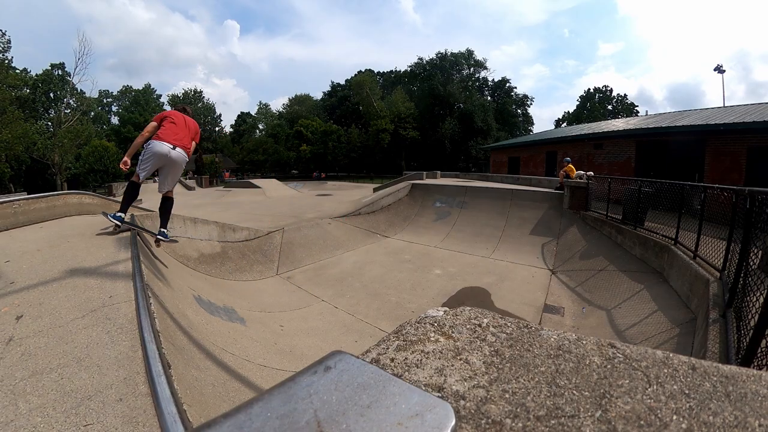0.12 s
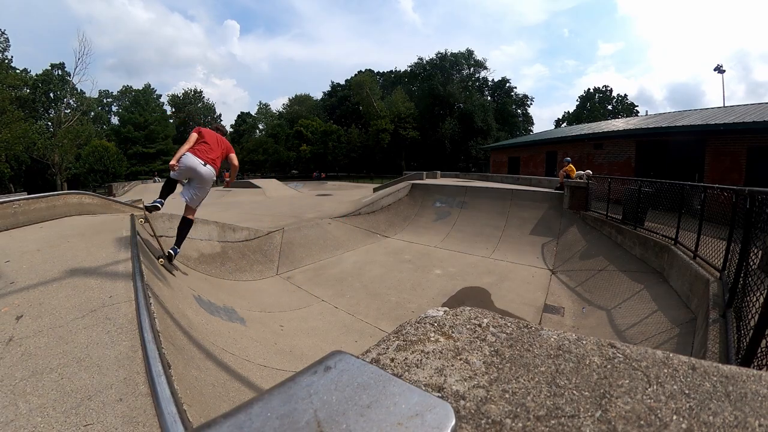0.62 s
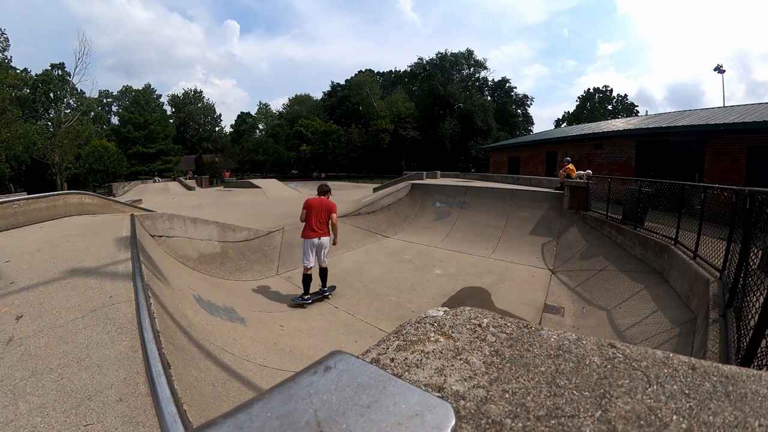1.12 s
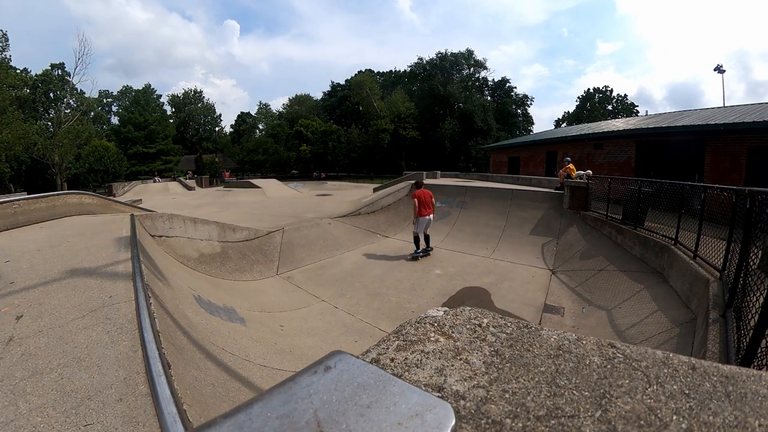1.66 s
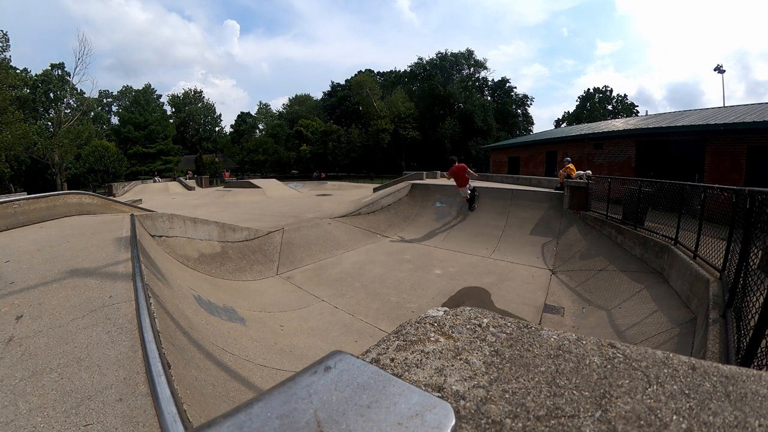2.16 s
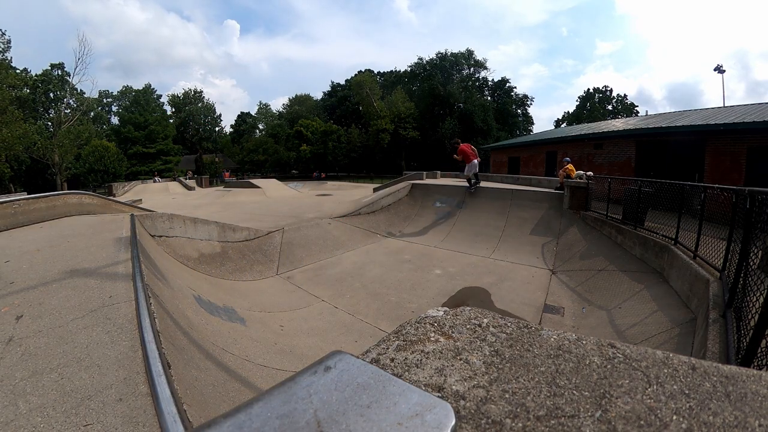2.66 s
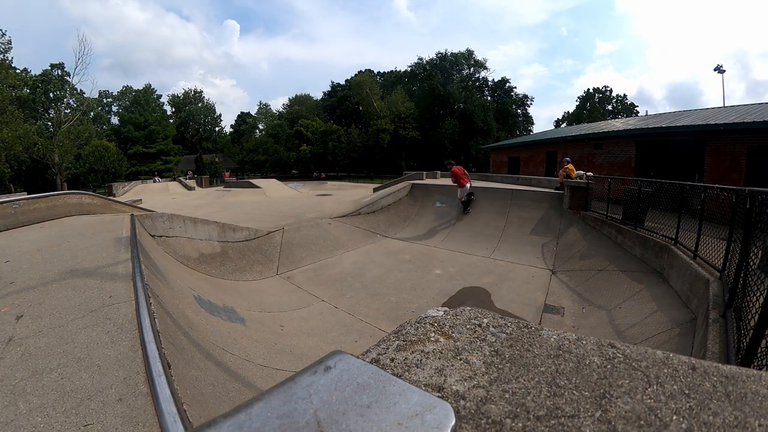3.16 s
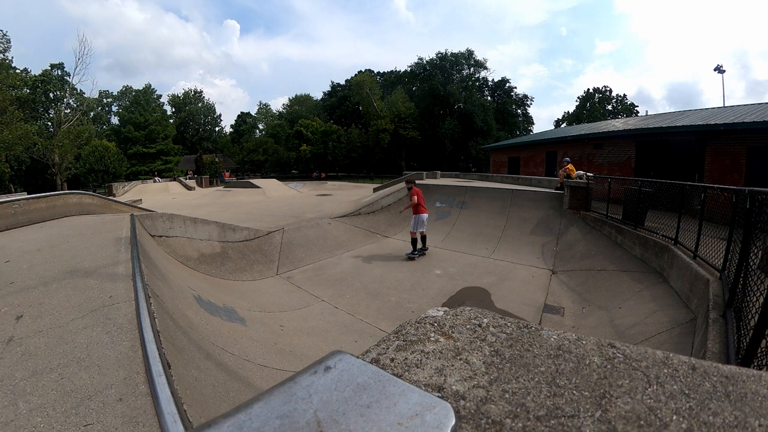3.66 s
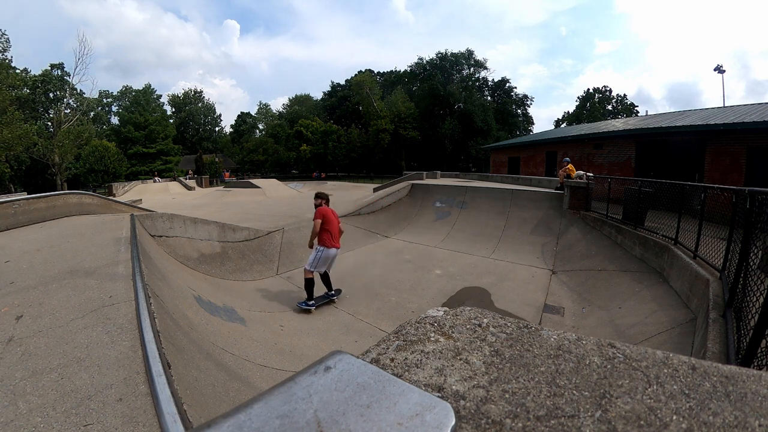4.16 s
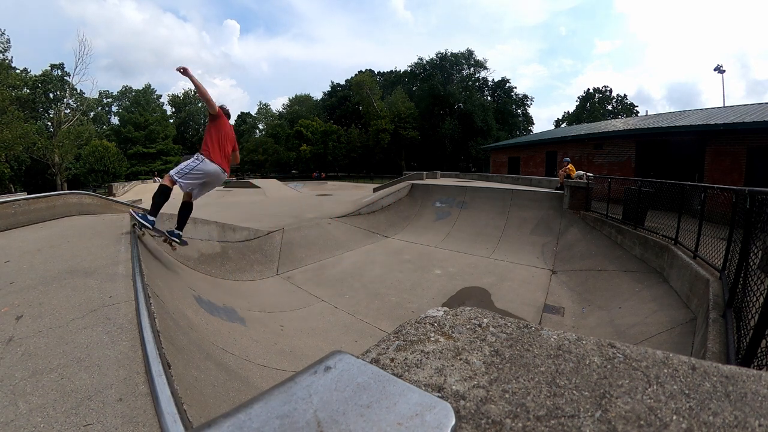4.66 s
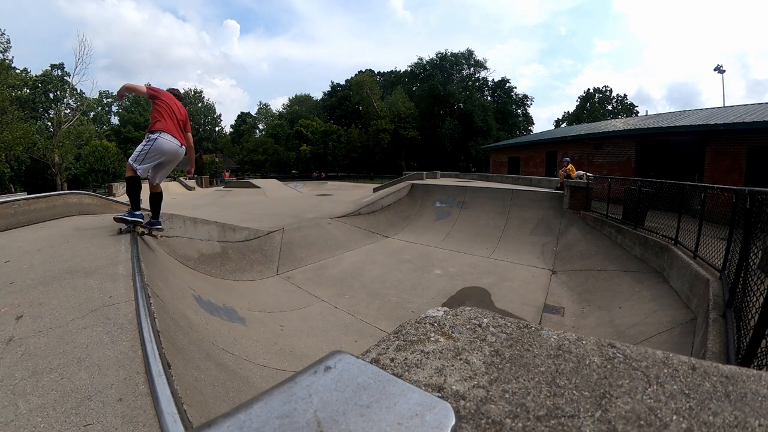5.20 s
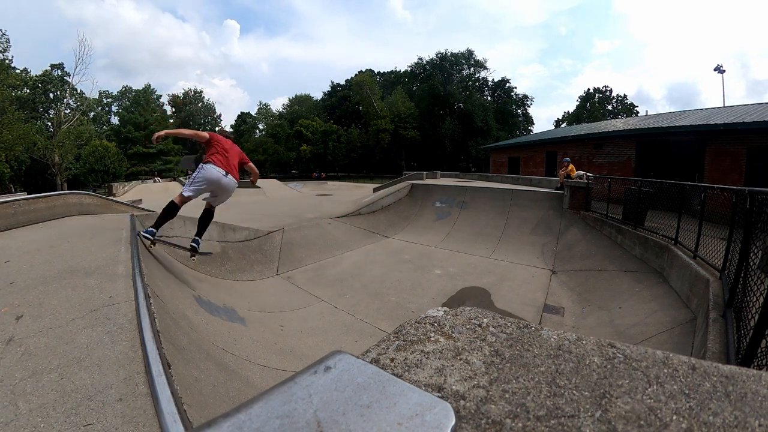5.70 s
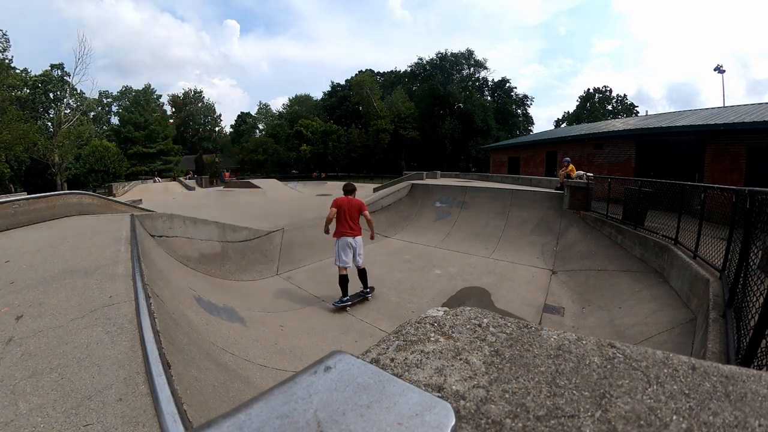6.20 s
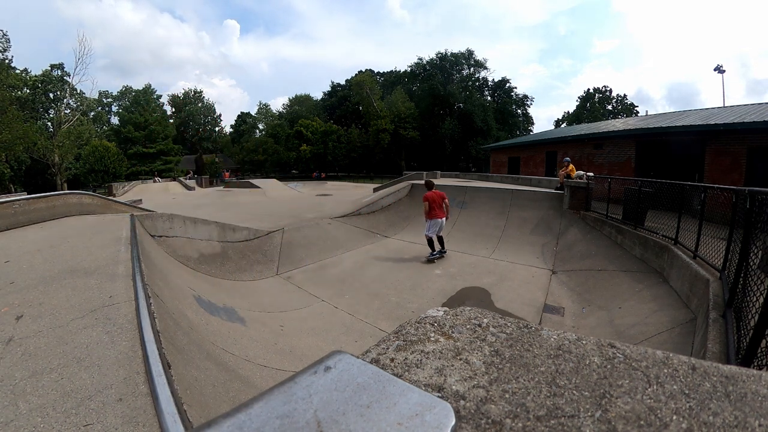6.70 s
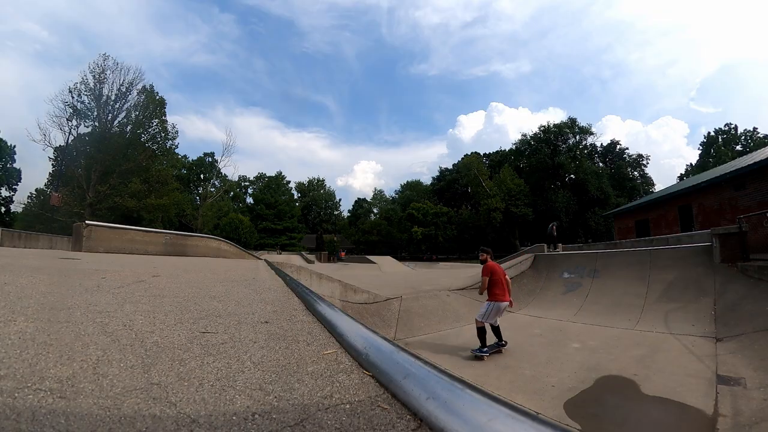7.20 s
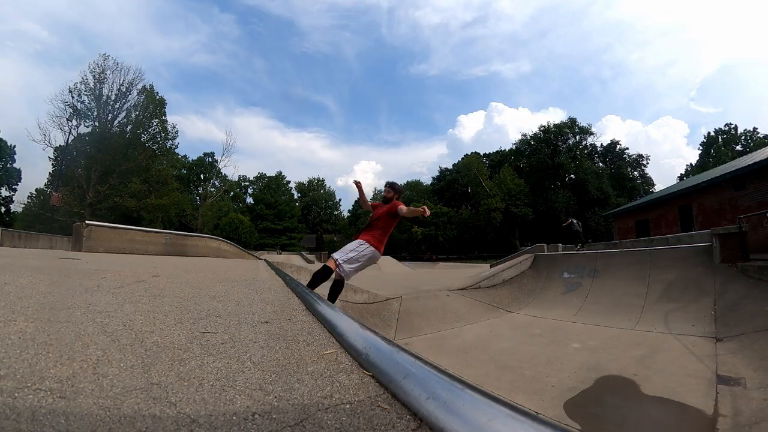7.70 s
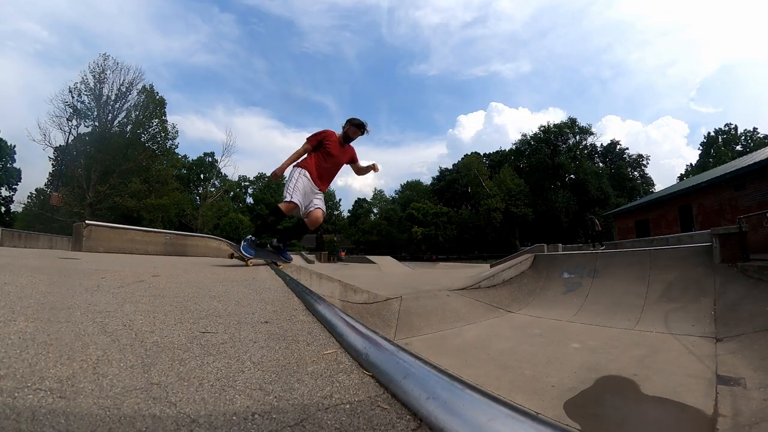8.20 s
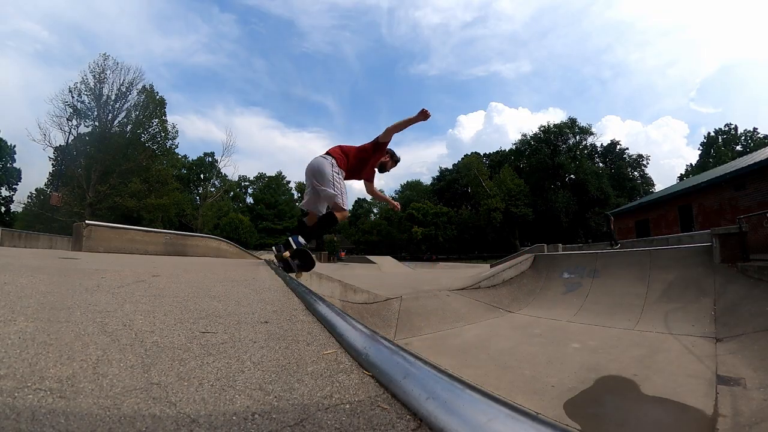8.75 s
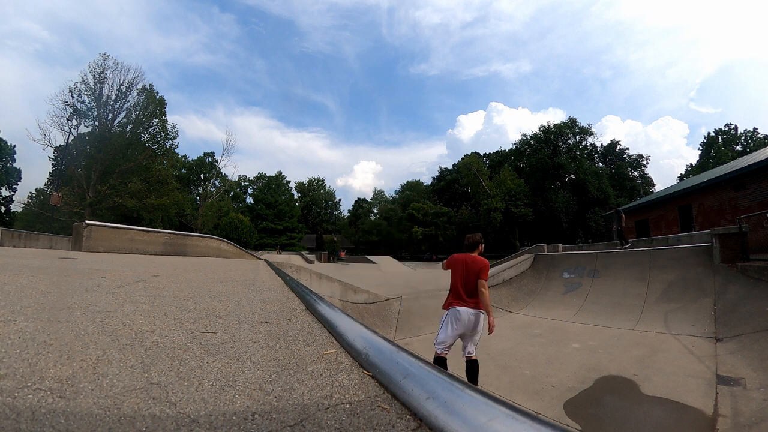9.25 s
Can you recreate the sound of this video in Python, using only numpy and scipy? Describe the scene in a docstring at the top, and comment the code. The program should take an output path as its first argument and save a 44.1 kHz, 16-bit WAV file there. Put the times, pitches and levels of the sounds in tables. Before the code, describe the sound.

Close hollow skateboard rolling swells and fades across a concrete bowl, broken by hard board knocks, paired joint clicks, gritty scuffs and low wind thumps.

```python
"""Skateboard in a concrete bowl

Heard close by, at the two microphone ports of a small camera: a board rolls in short runs.
Shaped noise makes the wheels drone through the deck; short rattles of force ring the deck's modes as the
board knocks and clacks on edges, joints and ground, and gliding rough tones grind along the steel edge.
The far wall answers with a slap and a diffuse tail. Lumpy deep noise swells at the ports, as wind and as low
thumps under some knocks; steadier coloured noise is the hiss of trees, traffic and insects far off."""
import sys
import numpy as np
from scipy import signal
from scipy.fft import rfft, irfft, next_fast_len
from scipy.io import wavfile
from scipy.ndimage import uniform_filter1d, map_coordinates

SR = 44100
rng = np.random.default_rng(int(sys.argv[2]) if len(sys.argv) > 2 else 0)


def invert_db(level):
    """Linear amplitude ratio for a level in decibels (20 dB per decade), elementwise."""
    return 10 ** (np.asarray(level, dtype=float) / 20)


def master_out(mix):
    """Clip the mix to full scale and print it as 16-bit PCM to the path in sys.argv[1]."""
    frames = np.transpose(np.atleast_2d(mix))
    ceiling = np.clip(frames, -1, 1)
    pcm = np.round(ceiling * 32767).astype(np.int16)
    wavfile.write(sys.argv[1], SR, pcm)


N = 412776  # length [samples]


def unit(x):
    """Scaled to rms 1."""
    return x / np.sqrt(np.mean(x ** 2) + 1e-20)


def along(points, hz):
    """(frequency, value) points read on a log frequency axis."""
    f, v = np.transpose(points)
    return np.interp(np.log(hz + 1), np.log(f + 1), v)


def curves(rows, t):
    """Each column after the time, read at times t."""
    s, *cols = np.transpose(rows)
    return [np.interp(t, s, col) for col in cols]


def wobble(rate):
    """A smooth random curve, rate knots a second."""
    knots = rng.standard_normal(int(N * rate / SR) + 4)
    return map_coordinates(knots, [np.arange(N) * rate / SR])


def filtered(x, response):
    """x times a complex response of frequency."""
    size = next_fast_len(x.shape[-1] + 8192)
    spectrum = rfft(x, size) * response(np.fft.rfftfreq(size, 1 / SR))
    return irfft(spectrum, size)[..., :x.shape[-1]]


def noise(spectrum):
    """Coloured noise of rms 1."""
    return unit(filtered(rng.standard_normal(N), lambda hz: invert_db(along(spectrum, hz))))


def above(hz, edge_hz, order=4):
    """A smooth weight from 0 below the edge to 1 above it."""
    return hz ** order / (hz ** order + edge_hz ** order)


def answer(x, decay, lag_s, rise_s):
    """A diffuse echo, a little different at each port, each frequency dying at its own speed."""
    hz, t, z = signal.stft(rng.standard_normal((2, SR // 2)), SR, nperseg=256)
    shape = invert_db(-60 * t / along(decay, hz)[:, None]) * (1 - np.exp(-t / rise_s))
    mid, side = signal.istft(z * shape, SR, nperseg=256)[1]
    tail = np.array([mid + 0.022 * side, mid - 0.022 * side]) / np.linalg.norm(mid)
    late = np.pad(x, (round(lag_s * SR), 0))
    return signal.fftconvolve(late[None], tail, axes=1)[:, :N]


# how far the left port leads the right: (frequency [Hz], phase [radians])
PORT_LEAD = [(100, 0), (950, 0), (1550, 0.67), (2330, 0.66), (7840, 0), (9130, 0.67)]
# the part of the sound that differs between the ports: (frequency [Hz], level re the sound [dB])
PORT_UNLIKE = [(130, -90), (300, -95), (650, -87), (1300, -28.5), (3000, -15), (6500, -3), (14000, -8)]


def ports(x):
    """Two close ports: the same sound, part of the upper range unlike, left a little ahead."""
    part = filtered(x, lambda hz: invert_db(along(PORT_UNLIKE, hz)))
    z = signal.stft(part, nperseg=256)[2]
    scrambled = z * np.exp(2j * np.pi * rng.random(z.shape))
    other = unit(signal.istft(scrambled, nperseg=256)[1][:N]) * np.std(part)
    sign = np.array([[1], [-1]])  # left, right
    return filtered(x, lambda hz: np.exp(.5j * sign * along(PORT_LEAD, hz))) + sign * other


# colour of the far hiss: (frequency [Hz], relative level [dB])
PARK_COLOUR = [(88, 16), (150, 14), (237, 6), (402, 0.5), (460, -1), (725, 4.5), (844, -1), (1160, 3),
               (1360, 2), (2690, -7), (3440, -9), (6940, -13.5), (7900, -33), (8700, -26), (14000, -71)]
# strength of the insects before their quick flutter: (time [s], level [dB])
INSECT_LEVEL = [(0, -83), (4.8, -53), (5.1, -61.5), (5.6, -53), (6.7, -94), (6.8, -54), (8.5, -54),
                (9.36, -65)]


def park():
    """Far hiss of trees and traffic as swaying coloured noise, and a thin fluttering band of insects."""
    insects_db, = curves(INSECT_LEVEL, np.arange(N) / SR)
    # (frequency [Hz], relative level [dB])
    band = [(5500, 3.5), (6600, 11), (7150, 5), (7500, 9), (7850, 5), (8300, -28)]
    sway_db, flutter_db = .6 * wobble(2.3), 0.88 * wobble(29)
    hiss = invert_db(-44 + sway_db) * noise(PARK_COLOUR)
    return hiss + invert_db(insects_db + flutter_db) * noise(band)


# colour of the deep swells: (frequency [Hz], relative level [dB])
SWELL_COLOUR = [(12, -43), (20, -1.5), (59, -7), (258, -29.5), (282, -47), (400, -60), (520, -38),
                (880, -120)]
# deep swells at the ports: wind gusts and low thumps under some of the board's blows,
# before the gain of each port; rise and fall are the times for 20 dB:
# (peak time [s], peak level [dB], rise [s], fall [s])
DEEP_SWELLS = [(.07, -37, 0.087, 0.18), (.8, -15, 0.21, 0.24), (1.04, -19.5, .09, 0.24),
               (1.41, -23.5, 0.2, 0.16), (2.47, -17, 0.34, 0.08), (2.8, -46, 0.71, 0.25),
               (3.02, -26, 0.076, 0.025), (4.17, -31, 0.063, 0.22), (4.8, -33.5, 0.3, 0.76),
               (5.42, -28, 0.056, 0.37), (6.13, -39, 1, 0.023), (6.8, -30.5, 0.14, 0.025),
               (8.13, -38, 0.3, 0.32), (8.78, -29.5, 0.25, 0.046)]


def swells():
    """Wind and low thumps at the ports: lumpy deep noise that swells and sinks, mostly unlike at the two."""
    t = np.arange(N) / SR
    span_db, calm_db = 20, -62
    swells_db = [db - span_db * np.maximum((s - t) / rise, (t - s) / fall)
                 for s, db, rise, fall in DEEP_SWELLS]
    level_db = np.maximum(np.max(swells_db, axis=0), calm_db)
    shared = noise(SWELL_COLOUR)
    lumps = [unit(invert_db(2.2 * wobble(14)) * (noise(SWELL_COLOUR) + .45 * shared)) for _ in range(2)]
    return invert_db(level_db + [[1.5], [2.2]]) * np.array(lumps)  # left and right port gain [dB]


# the far wall's answer fades while the board is up on that wall: (time [s], relative level [dB])
WALL_LEVEL = [(0, 2), (2, -3), (3, -21.5), (4, 1), (9.36, -5)]
# how the wall's diffuse answer dies: (frequency [Hz], t60 [s])
WALL_DECAY = [(150, 0.15), (800, 0.11), (3000, 0.21), (9000, 0.22)]


def wall_tail(hits):
    """Diffuse answer of the far wall: rough concrete returns little treble."""
    echo_db, = curves(WALL_LEVEL, np.arange(N) / SR)
    far = filtered(hits, lambda hz: 1 - above(hz, 1200, order=2))
    return answer(invert_db(echo_db) * far, WALL_DECAY, lag_s=0.028, rise_s=0.19)


def wall_slap(hits):
    """First return from the far wall, spread in time by its curve."""
    echo_db, = curves(WALL_LEVEL, np.arange(N) / SR)
    lag_s, smear_s = 0.040, 0.003
    dull = filtered(hits, lambda hz: 1 - above(hz, 6800, order=2))
    slap = invert_db(echo_db - 13) * np.pad(dull, (round(lag_s * SR), 0))[:N]
    t = np.arange(SR // 20) / SR
    spread = rng.standard_normal(len(t)) * np.exp(-t / smear_s)
    return signal.fftconvolve(slap * invert_db(3.9 * wobble(300)), spread / np.linalg.norm(spread))[:N]


# how the scatter from ramps and sheds dies: (frequency [Hz], t60 [s])
SCATTER_DECAY = [(150, 0.74), (1000, 0.16), (8000, 0.15)]


def scatter(hits):
    """Ramps and sheds throw the blows back as a ragged, quick diffuse tail."""
    return invert_db(-14.5) * answer(hits * unit(wobble(1300)), SCATTER_DECAY, lag_s=0.0074, rise_s=0.00081)


# second path off the concrete: (time [s], lag [ms], share of the direct sound [0-1])
GROUND_BOUNCE = [(0, 0.58, 0), (1, 0.26, 0.09), (2.3, 0.26, 0.45), (3.3, 0.24, 0.25), (4.2, 0.24, 0.13),
                 (4.6, 0.54, 0), (6, 0.37, 0.12), (6.7, 0.3, 0.41), (6.85, 0.39, 0.34), (7.25, 0.42, 0.43),
                 (7.5, 0.62, 0.72), (7.8, 0.74, 0.15), (8.9, 0.86, 0.25), (9.15, 0.63, 0.67),
                 (9.36, 0.52, 0.68)]


def off_the_ground(x):
    """A second, duller arrival a fraction of a millisecond late combs the spectrum."""
    lag_ms, share = curves(GROUND_BOUNCE, np.arange(N) / SR)
    dull = filtered(x, lambda hz: 1 - above(hz, 6000, order=2))
    return x + share * map_coordinates(dull, [np.arange(N) - lag_ms * SR / 1000])


# steel grinding on the edge:
# (start [s], end [s], level [dB], start pitch [Hz], end pitch [Hz])
EDGE_SCRAPES = [(4.794, 4.833, -37, 1500, 1580), (4.842, 4.921, -37, 1560, 1077),
                (5.748, 5.82, -39, 3870, 1700), (5.826, 5.843, -40, 2930, 1830),
                (6.83, 6.86, -26, 1900, 1576), (8.013, 8.147, -41, 2080, 1896),
                (8.21, 8.398, -41, 1955, 1900), (8.815, 8.835, -31, 1466, 1480)]


def scrapes():
    """Gritty stick and slip: a smeared pitch with its overtone, gliding as the axle slides."""
    out, t = np.zeros(N), np.arange(N) / SR
    grit = invert_db(2.9 * wobble(330))
    smear = 0.146 * wobble(990)
    for start, end, db, start_hz, end_hz in EDGE_SCRAPES:
        on = (t >= start) & (t < end)
        u = (t[on] - start) / (end - start)
        pitch_hz = (start_hz + (end_hz - start_hz) * u) * (1 + smear[on])
        phase = 2 * np.pi * np.cumsum(pitch_hz) / SR
        stroke = np.minimum(1, 8 * np.minimum(u, 1 - u))
        tone = np.sin(phase) + 0.54 * np.sin(2 * phase)
        out[on] += invert_db(db) * stroke * unit(grit[on] * tone)
    return out


# one list for each run across the bowl:
# (time [s], relative rolling strength [dB], drone centre [Hz], relative wheel bite [dB])
BOWL_RUNS = [
    [(0.56, -45, 510, -2), (0.924, -15.5, 500, -6), (0.978, -20.5, 390, 1), (1.172, -25, 437, -2),
     (1.22, -27.5, 384, -7), (1.442, -28.5, 430, -1.5), (1.866, -25.5, 390, -5), (1.956, -21.5, 507, 0),
     (2.062, -20.5, 482, 3), (2.204, -25, 422, 2), (2.29, -34, 460, 9), (2.46, -54, 300, 6)],
    [(3.07, -54, 466, 5), (3.14, -30.5, 596, -4), (3.175, -24.5, 596, -17), (3.242, -26, 475, -5.5),
     (3.404, -21.5, 450, 0), (3.624, -32, 340, 0), (3.89, -28.5, 312, -1), (3.912, -26, 390, -5),
     (4.242, -21, 363, -1.5), (4.388, -19.5, 400, 2), (4.43, -20.5, 493, -3.5), (4.76, -27.5, 340, -22.5),
     (4.96, -47, 340, 2)],
    [(5.76, -46, 424, 15), (5.89, -42, 550, 9), (5.942, -24, 446, 1), (5.998, -14.5, 426, -8),
     (6.034, -22.5, 503, 2.5), (6.148, -19, 425, 3.5), (6.214, -16.5, 480, -4), (6.236, -26.5, 413, -2.5),
     (6.428, -32.5, 357, 7.5), (6.544, -34, 490, 7), (6.732, -35.5, 430, 8), (6.76, -32.5, 476, 9)],
    [(6.78, -28.5, 342, -6), (6.83, -28, 557, 7), (7.004, -22, 366, -10), (7.072, -25.5, 430, -3.5),
     (7.156, -21, 350, -6), (7.272, -19, 410, -5), (7.464, -16.5, 338, 0), (7.792, -23, 407, -5),
     (7.818, -24.5, 500, -9.5), (7.948, -38.5, 334, 1.5), (8.014, -32.5, 450, -3), (8.08, -65, 415, 12)],
    [(8.8, -33, 310, 6), (8.856, -35.5, 290, -1), (9.02, -23.5, 400, -24), (9.068, -13.5, 465, -28),
     (9.144, -13.5, 510, -16), (9.232, -15.5, 478, -3), (9.316, -17.5, 354, -2), (9.36, -14, 353, -4)],
]
# shoes, tail or wheels scuff sideways:
# (centre [s], half length [s], relative grit level [dB], body re grit [dB])
SIDE_SCUFFS = [(0.104, 0.1, -43.5, 5.5), (0.256, 0.088, -44.5, -18), (2.62, 0.063, -47, 1),
               (4.6, 0.062, -34.5, -36), (5.338, 0.067, -45, -31), (5.597, 0.079, -52, 9.5),
               (5.846, 0.04, -43, 20), (6.863, 0.0062, -52, 15), (8.177, 0.11, -37.5, 1),
               (8.377, 0.055, -40.5, -4), (8.68, 0.19, -43, 1.5)]


def controls(t):
    """Relative levels of thrum, drone, rasp and grit, and the drone centre: strength and bite drive them."""
    strength_db, centre_hz, bite_db = curves(np.vstack(BOWL_RUNS), t)
    rolling = sum((t >= run[0][0]) & (t <= run[-1][0] + .03) for run in BOWL_RUNS) > 0
    over_db = strength_db + 27  # over the usual strength
    # slopes are dB per dB; the drone follows the strength one to one
    thrum_db = -35.5 + 0.23 * over_db
    drone_db = strength_db - 0.5
    rasp_db = -32 + 0.69 * over_db + bite_db
    grit_db = -39 + 0.68 * over_db + 0.37 * bite_db
    levels = rolling * invert_db([thrum_db, drone_db, rasp_db, grit_db])
    for s, half_s, db, body_db in SIDE_SCUFFS:
        layers_db = db + np.array([[body_db + 2.5], [body_db], [body_db / 2 - 0.5], [0]])
        levels = np.hypot(levels, np.exp(-((t - s) / half_s) ** 2) * invert_db(layers_db))
    return levels, centre_hz


# colour of wheels on concrete: (frequency [Hz], relative level [dB])
WHEEL_COLOUR = [(53, 25), (90, -1.5), (138, 2.5), (182, 0), (241, 2), (354, -5.5), (402, -9.5), (458, -9),
                (815, -6.5), (1120, -6), (1280, -9), (2140, -23.5), (7880, -31.5), (11600, -38.5),
                (15000, -47)]
# what the board rings with, damped by the rider's feet; blows() plays it too:
# (frequency [Hz], relative level [dB], t60 before the extra damping of a blow [s])
BOARD_MODES = [(155, -1, .05), (237, -4, .035), (350, 0, .035), (440, -1, .03), (530, 0, .035),
               (690, -2, .025), (850, -3, .022), (1104, -2, .022), (1300, -4, .018), (1550, -3, .018),
               (1800, -5, .016), (2120, -4, .016), (2450, -5, .014), (3100, -6, .012), (3550, -6, .012)]


def roll():
    """The grain of the concrete shakes the wheels; the deck drones at a pitch that moves with load and angle."""
    grain = rng.standard_normal(N) * invert_db(1.37 * wobble(150) + 1.3 * wobble(30))  # uneven surface
    grain = grain + 5 * rng.standard_normal(N) * (rng.random(N) < 300 / SR)  # loose specks of grit
    grain = grain + 8 * rng.standard_normal(N) * (rng.random(N) < 35 / SR)  # pits and pebbles
    hz, t, z = signal.stft(grain, SR, nperseg=1024, noverlap=768)
    hz = hz[:, None]
    levels, centre_hz = controls(t)

    from_centre = np.log((hz + 1) / centre_hz)
    hump = 1 + 1.7 * np.exp(-(from_centre / 0.5) ** 2)
    hump = hump + 2.6 * np.exp(-(from_centre / 0.08) ** 2)  # the sharp core of the drone
    hump = hump * (0.27 + 0.82 * above(hz / centre_hz, 1))  # little sounds far below the drone
    # each mode falls to half its height 2.26 / t60 Hz to either side
    deck = sum(invert_db(db) / (1 + ((hz - mode_hz) * t60 / 2.26) ** 2) for mode_hz, db, t60 in BOARD_MODES)
    colour = invert_db(along(WHEEL_COLOUR, hz)) * (1 + .9 * deck) * np.ones_like(t)

    above_thrum, above_deck, above_rasp = above(hz, 214, order=6), above(hz, 747), above(hz, 1770)
    thrum = colour * (1 - above_thrum) * above(hz, 92)
    drone = colour * hump * above_thrum * (1 - above_deck)
    rasp = colour * above_deck * (1 - above_rasp)
    grit = colour * above_rasp
    gain = sum(level * part / np.sqrt(np.mean(part ** 2, axis=0))
               for part, level in zip((thrum, drone, rasp, grit), levels))
    patches = uniform_filter1d(uniform_filter1d(rng.standard_normal(z.shape), 3, 0), 30, 1)
    patchy_db = (2.2 - .9 * above_rasp) * unit(patches)
    return signal.istft(z * gain * invert_db(patchy_db - 5), SR, nperseg=1024, noverlap=768)[1][:N]


# single knocks and clacks of the board, on edges, joints and ground; the steel gets 2.5 dB on top:
# (time [s], peak of the ring [dB], loudest ring [Hz], steel re ring [dB], contact [ms])
BOARD_KNOCKS = [(.033, -17, 1230, 7, 7.2), (.0385, -3, 2160, -7, 1.6), (.047, -21, 200, -32, 8),
                (.051, -8, 757, -7.5, 1), (.226, -25.5, 740, -13, 6.9), (.246, -26, 816, -2, 4),
                (.259, -26, 900, -10, 5.8), (0.546, -7.5, 640, -19.5, 17.7), (.549, -8, 1230, -2.5, 1.7),
                (.559, -12.5, 600, -31, 1.3), (.739, -4, 1310, -13, 2.4), (.742, -8, 585, -11.5, 6.3),
                (2.504, -5.5, 1580, -13.5, 4.8), (2.507, -11.5, 740, -17, 4.7),
                (2.518, -23.5, 526, -11, 9.7), (3.011, -9.5, 1180, -22, 6.6), (3.0145, -6, 770, -23, 1.7),
                (3.0185, -6, 314, -30, 1.2), (3.024, -11, 560, -24, 5.6), (3.033, -18.5, 776, -27, 4.2),
                (3.172, -9.5, 1100, -17, 7.6), (3.179, -5, 790, -22, 5.8), (3.565, -9.5, 260, -23, 8.1),
                (4.69, -13, 1443, -6.5, 8.6), (4.816, -7, 1310, -11, 2.9), (4.83, -24, 615, 5.5, 1.5),
                (4.845, -13, 374, -10, 6.6), (4.864, -11.5, 342, -13, 3.4), (4.88, -16.5, 1210, -12.5, 4),
                (4.897, -27, 420, 3, 7), (4.919, -49, 440, 0, 5.5), (4.967, -37, 627, 7.5, 0.57),
                (5.569, -23.5, 1138, -4, 9), (5.585, -42, 500, 7, 5.7), (5.7245, -11, 1520, -1.5, 3),
                (5.738, -16, 1710, -3.5, 4.6), (5.766, -28, 2540, 2, 4.5), (5.786, -6, 1380, -11, 5.9),
                (5.827, -12.5, 454, -14, 17), (5.857, -4, 580, -6, 1.7), (6.276, -7, 790, -16, 3.6),
                (6.785, -13, 650, -29, 6.5), (6.798, -10, 1150, -38, 1.8), (6.818, -13, 700, -18, 9.2),
                (6.825, -15, 620, -12, 5.4), (6.836, -14.5, 910, -10, 7.4), (6.845, -26, 1930, -5, 4.2),
                (6.861, -15.5, 333, -11, 2.1), (7.394, -3, 352, -33, 1.3), (7.455, -7, 448, -20, 1.1),
                (7.737, -25.5, 1300, -4, 20), (7.936, -17.5, 1220, -9.5, 14), (7.954, -13, 795, -16, 14.7),
                (8.021, -11.5, 1390, -14, 7.1), (8.029, -9, 467, -41, 5.1), (8.039, -6, 884, -25, 2.9),
                (8.079, -39, 1490, -11, 1.2), (8.084, -10.5, 1780, -12.5, 5),
                (8.098, -25.5, 1900, -10, 4.4), (8.1295, -16.5, 1300, -17, 3.3),
                (8.149, -11, 1085, -1.5, 6.1), (8.154, -4.5, 444, -32, 3), (8.158, -12.5, 167, -32, 5.2),
                (8.193, -22, 410, -11, 8.9), (8.391, -23, 1600, 0, 1.5), (8.394, -17.5, 1060, -10, 4.3),
                (8.4525, -18.5, 1520, -10, 0.98), (8.458, -15, 1380, -13, 3.3), (8.835, -7, 1150, -15, 4.7),
                (8.84, -7.5, 252, -24, 4.8), (8.929, -11, 1000, -15, 9), (8.943, -5, 885, -22.5, 3.5),
                (8.9745, -12, 1300, -9, 1.8), (8.976, -4.5, 454, -9, 5.9), (8.985, -9.5, 300, -25, 3.2),
                (8.994, -8, 1130, -16, 2.1), (8.995, -2.5, 223, -28, 3.4)]
# slab joints, crossed by both axles:
# (front time [s], rear time [s], front level [dB], rear level [dB], loudest ring under the front axle [Hz])
SLAB_JOINTS = [(1.1385, 1.2155, -5.5, -7, 760), (1.808, 1.874, -9, -9, 760), (3.556, 3.633, -9, -12, 950),
               (4.1365, 4.2095, -9, -9, 520), (4.188, 4.254, -5.5, -4, 520),
               (6.1945, 6.2695, -5.5, -7, 800)]


def contacts():
    """Single knocks, then joints crossed by both axles, as like rows; the tail rings lower than the nose."""
    steel_db, contact_ms, rear_ring = -22, 3, .65
    crossings = []
    for front, rear, front_db, rear_db, hz in SLAB_JOINTS:
        crossings.append((front, front_db, hz, steel_db, contact_ms))
        crossings.append((rear, rear_db, rear_ring * hz, steel_db, contact_ms))
    return BOARD_KNOCKS + crossings


def blows():
    """Each contact is a short rattle of force: it rings the modes near the struck spot, the steel only cracks."""
    out, t = np.zeros(N + SR), np.arange(SR // 8) / SR
    hz, level, t60 = np.transpose(BOARD_MODES)[:, :, None]
    damping = 1.5  # a blow dies faster than the free ring, wheels and tail pressed down
    below_db, above_db = 11, 3  # loss per octave below and above the loudest ring
    steel = np.vstack([signal.butter(1, [1600, 3800], "bandpass", fs=SR, output="sos"),
                       signal.butter(2, 8000, fs=SR, output="sos")])
    for s, db, ring_hz, steel_db, ms in contacts():
        contact = np.exp(-t * 1000 / ms) * (1 - np.exp(-t * 1000 / (0.19 * ms + 0.39)))
        ragged = invert_db(3.7 * map_coordinates(rng.standard_normal(128), [t * 600]))  # the contact chatters
        force, chatter = rng.standard_normal((2, len(t))) * contact * ragged
        # the first push, half a cycle of the struck ring; long contacts build up instead
        push = np.sin(np.pi * np.minimum(1, 2 * ring_hz * t))
        force = force + 3 * np.exp(-ms / 2.5) * push
        softness = signal.butter(2, 1200 + 0.46 * ring_hz, fs=SR, output="sos")
        force = signal.sosfilt(softness, force)  # soft blows pass no sharp edge

        pitch_hz = hz * rng.normal(1, 0.07, hz.shape)
        octaves = np.log2(hz / ring_hz)
        pitch_hz[np.abs(octaves).argmin()] = ring_hz  # the grip of feet and ground pulls the nearest mode
        nearness_db = 4 * np.exp(-(octaves / 0.25) ** 2) - np.maximum(-below_db * octaves, above_db * octaves)
        scatter_db = rng.normal(0, 2, hz.shape)
        bends = 1 - np.exp(-t * hz / 0.29)  # low modes take a moment to bend
        decay_db = -60 * damping * t / t60
        modes = invert_db(level + nearness_db + scatter_db + decay_db) * bends * np.sin(2 * np.pi * pitch_hz * t)

        ring = signal.fftconvolve(force, modes.sum(axis=0))[:len(t)]
        crack = signal.sosfilt(steel, chatter * contact ** 0.036)
        start = round(s * SR)
        out[start:start + len(t)] += invert_db(db) * ring / np.abs(ring).max()
        out[start:start + len(t)] += invert_db(db + steel_db + 2.5) * crack / np.abs(crack).max()
    return signal.lfilter(*signal.butter(3, 105, "highpass", fs=SR), out[:N])  # small board, no deep bass


def scene():
    """Board and park at the ports, with wall, scatter and deep swells."""
    hits = blows()
    board = off_the_ground(roll() + scrapes() + hits)
    at_ports = ports(board + wall_slap(hits) + park())
    space = wall_tail(hits) + scatter(hits)
    return invert_db([[.3], [-.3]]) * at_ports + space + swells()  # left port slightly louder


def top_cut(x):
    """Nothing passes above the cut-off."""
    return signal.sosfilt(signal.butter(12, 15120, fs=SR, output="sos"), x)


def record(dry):
    """The microphone thins the deepest bass and dulls the top; the input rounds off peaks."""
    thinned = filtered(dry, lambda hz: above(hz, 30, order=3))
    dulled = filtered(thinned, lambda hz: invert_db(-22 * above(hz, 12730)))
    rounded = dulled / (1 + np.abs(dulled / .95) ** 4) ** (1 / 4)
    return top_cut(rounded)


dry = scene()
out = record(dry)
master_out(out)
```